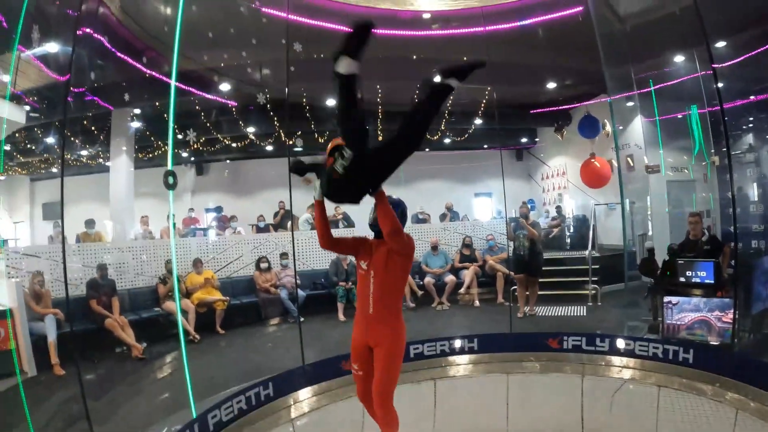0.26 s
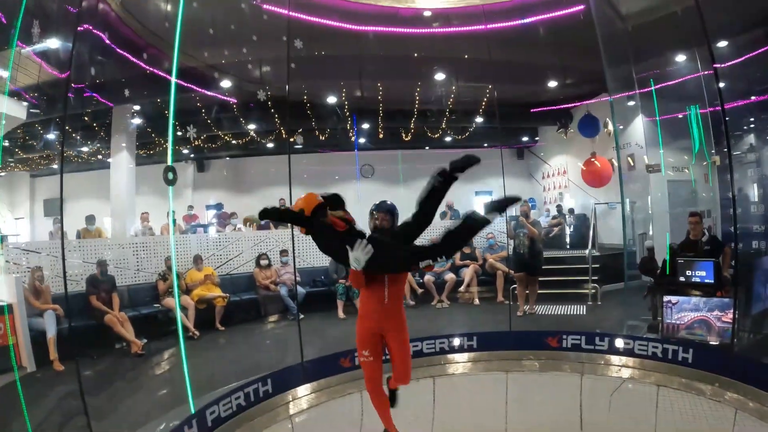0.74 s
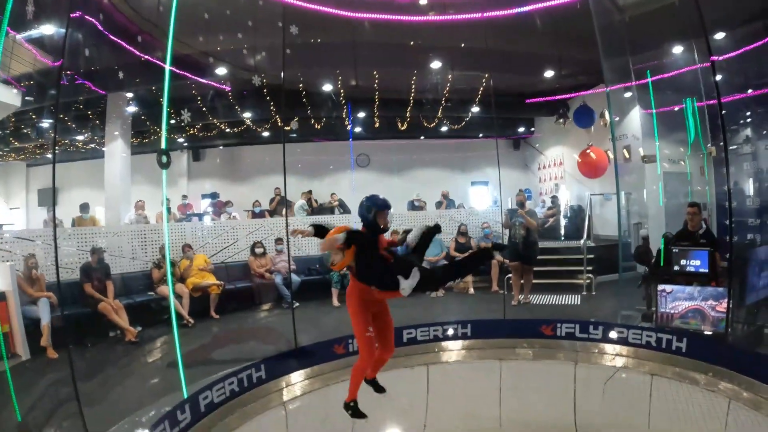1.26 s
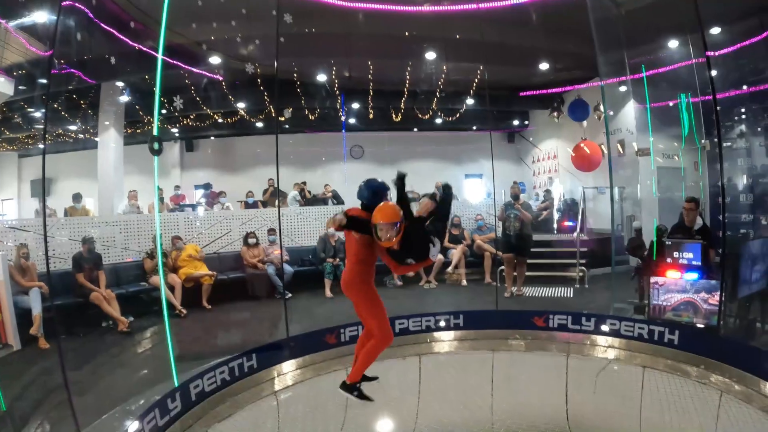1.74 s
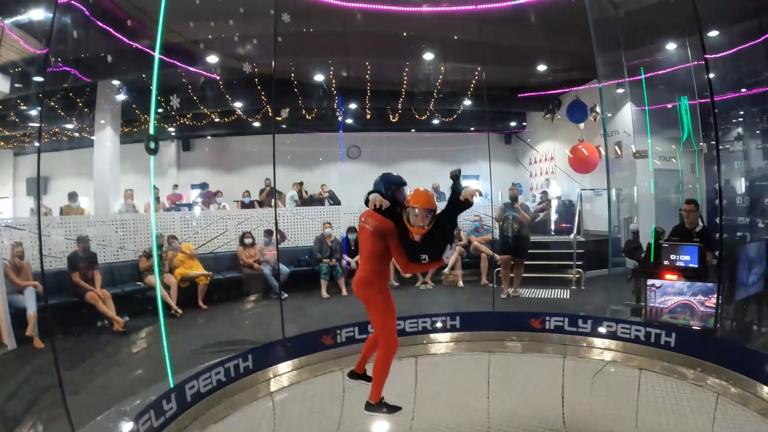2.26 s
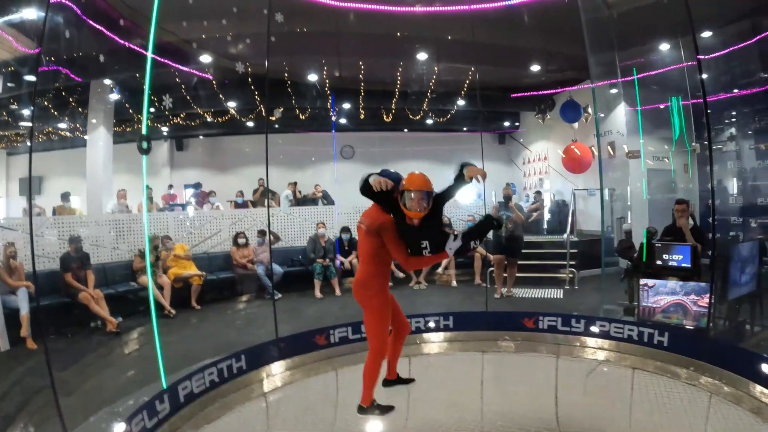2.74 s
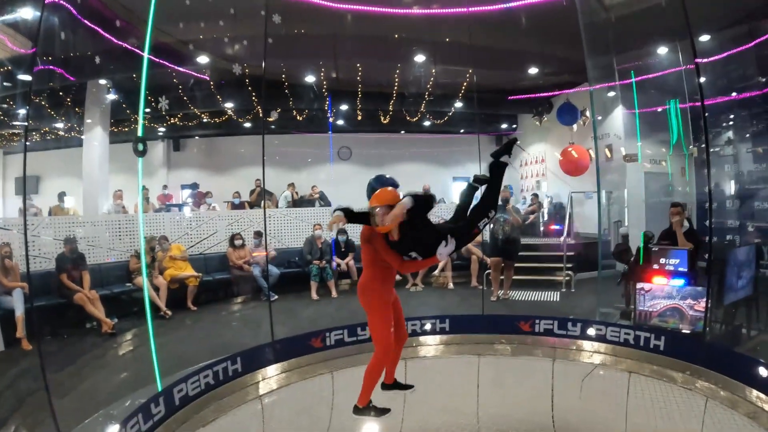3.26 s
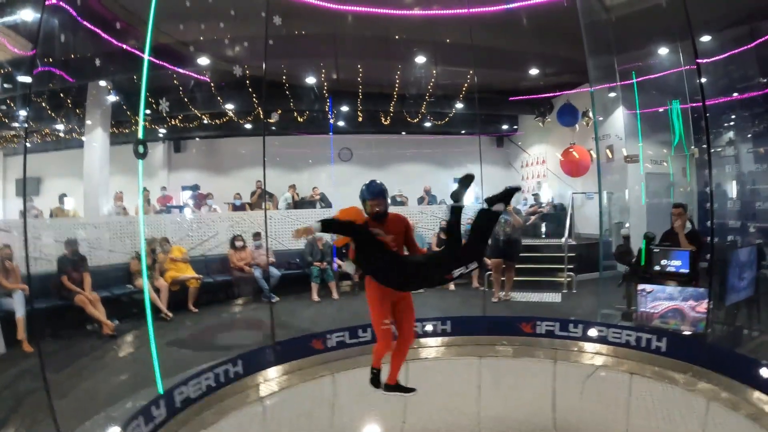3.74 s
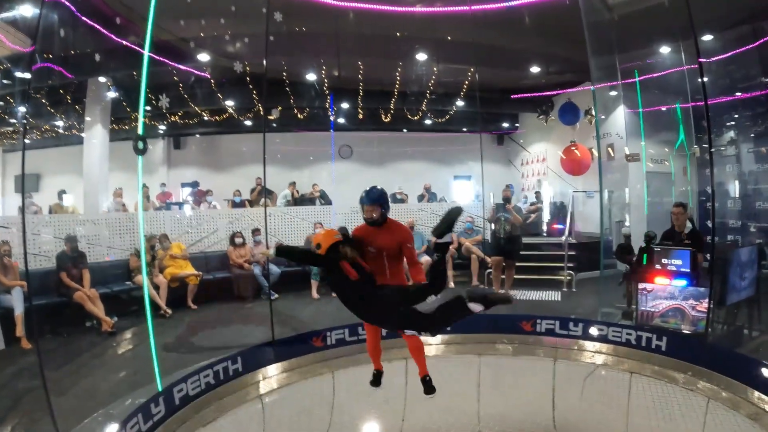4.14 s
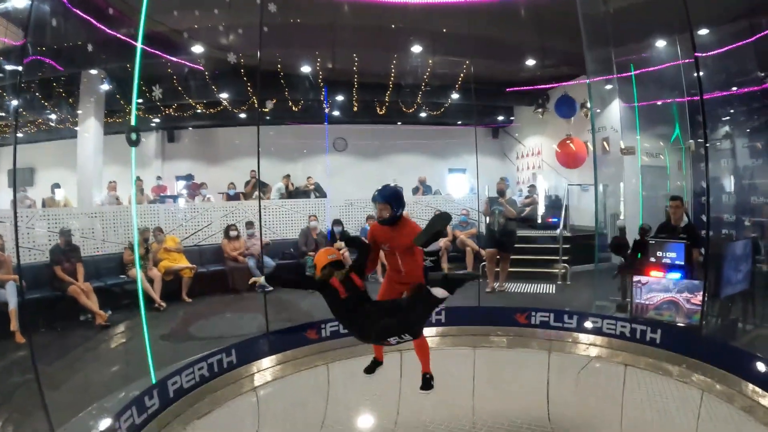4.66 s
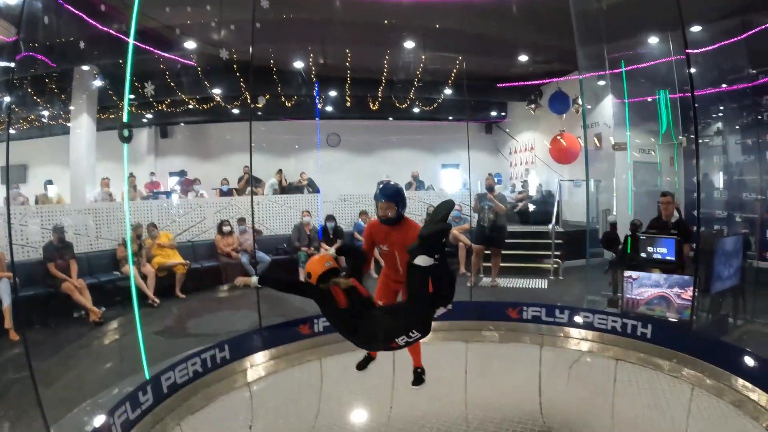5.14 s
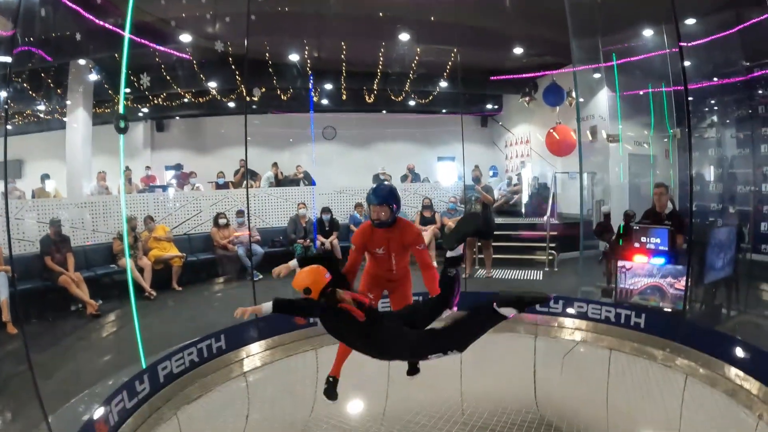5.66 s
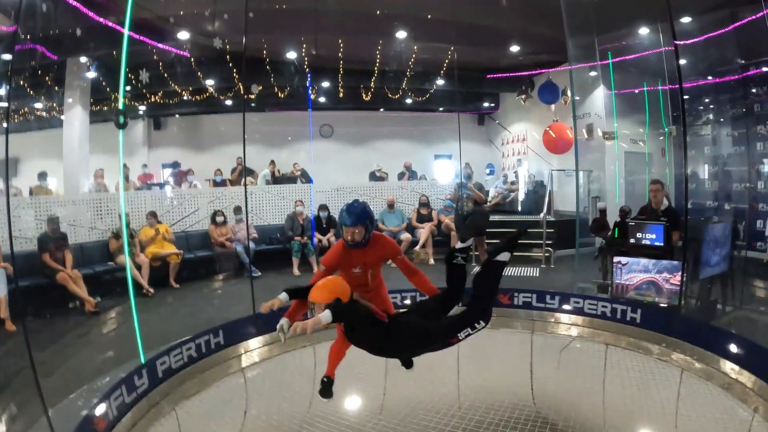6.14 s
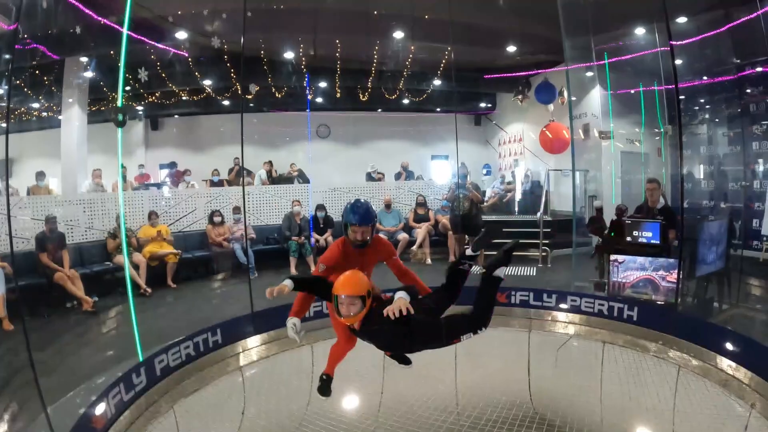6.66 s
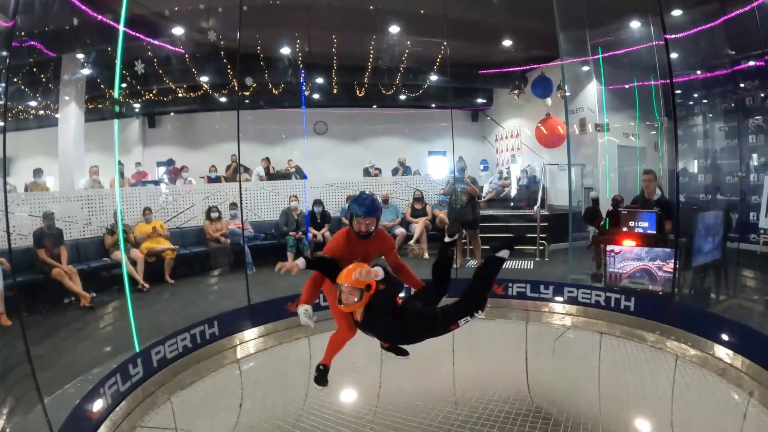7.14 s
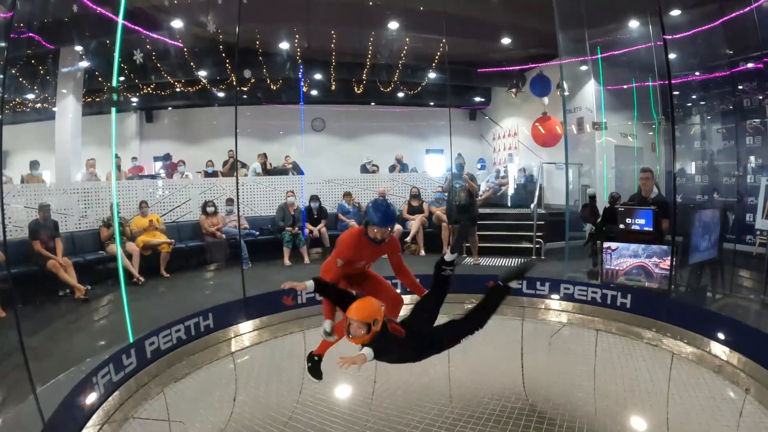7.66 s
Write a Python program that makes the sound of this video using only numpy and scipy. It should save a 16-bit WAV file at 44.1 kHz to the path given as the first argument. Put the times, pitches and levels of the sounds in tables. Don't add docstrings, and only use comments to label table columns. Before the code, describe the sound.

Close, rough wind noise fills the whole stretch, with the microphone sitting directly in the airflow of an indoor flight chamber. Bass buffeting swells heavily at the start and again around three seconds, under a fluttering rush with sharp little snaps and puffs. Distant fans whine weakly in a blurred high band. Late on, the low throb thins and the whine grows slightly clearer.

```python
import sys
import numpy as np
from scipy import signal
from scipy.fft import rfft, irfft
from scipy.io import wavfile
from scipy.ndimage import uniform_filter1d

SR = 44100
rng = np.random.default_rng(int(sys.argv[2]) if len(sys.argv) > 2 else 0)


def unload_audio(sound):
    columns = np.transpose(np.atleast_2d(sound))
    steps = np.round(np.clip(columns, -1, 1) * 32767)
    wavfile.write(sys.argv[1], SR, steps.astype(np.int16))


def rack_gain(trim_db):
    fader = np.asarray(trim_db, float)
    return 10 ** (fader / 20)


N = 348390

# start_s, turbulence_db, large_eddy_share_db, fan_whine_db
FLOW = [(0, 1, 5.5, -52.5), (.53, 0.7, -1.5, -51), (1.05, 0, 0, -49.5), (1.58, 0, 0, -49.5),
        (2.11, 0.8, 1, -49.5), (2.63, 0.5, 7, -51), (3.16, 1, 8.5, -51.5), (3.69, 0, 3.5, -53),
        (4.21, 1.5, 2, -52.5), (4.74, 1.2, 0, -53), (5.27, 0.55, 5.5, -54.5), (5.79, -1.5, 6, -54),
        (6.32, 0, -1.5, -53.5), (6.85, -0.7, -2, -49), (7.37, 0.2, -0.5, -48), (7.9, -1.6, -8.5, -47)]
# pitch_hz, level_db
BUFFET_SPECTRUM = [(12, -28.5), (22, -2), (50, 2.5), (111, -2), (171, -10), (261, -14.5), (421, -25),
                   (801, -43.5), (3010, -130)]
# pitch_hz, level_db
THROB_SPECTRUM = [(61, -4), (111, -10), (171, -8.5), (261, -11.5), (421, -27), (801, -46.5), (3010, -130)]
# pitch_hz, level_db
RUSH_SPECTRUM = [(101, -13), (201, -15), (391, -12.5), (701, -18), (1091, -23), (1611, -29), (2661, -34),
                 (3702, -38.5), (4730, -46), (7900, -59), (10200, -71), (12150, -78.5), (13500, -89),
                 (15650, -113)]
# pitch_hz, depth_db
GUST_DEPTH = [(210, 4), (710, 2), (2010, 4), (5020, 4), (10200, 2.5)]
# pitch_hz, width_hz, level_db
FAN_BANDS = [(3407, 220, -0.5), (3260, 290, -1.5), (3067, 270, -2)]
# start_s, peak_db
SNAPS = [(0.055, -48.5), (0.0686, -36), (0.5453, -32.5), (0.582, -43.5), (0.9368, -35.5), (1.021, -40),
         (1.4527, -39), (1.948, -42), (2.5614, -40), (2.728, -40), (2.8284, -31.5), (2.9148, -38.5),
         (3.0557, -39.5), (3.1552, -47), (3.264, -42), (3.2839, -33), (3.345, -38), (3.445, -41),
         (3.7745, -43), (4.097, -38.5), (4.1182, -36.5), (4.223, -38), (4.4988, -35.5), (4.5048, -36),
         (4.7107, -42), (4.8885, -37), (5.022, -41), (5.1208, -39), (5.687, -38), (6.0125, -45)]
# centre_s, body_db, treble_db, length_s
SURGES = [(0.07, 2.5, -4, 0.048), (0.315, 1, 7.5, 0.027), (0.537, 5, 3.8, 0.032), (0.932, 2.5, 3, 0.033),
          (1.004, 1.5, -3, 0.057), (1.213, 2.5, 6, 0.024), (1.431, 2, 1.5, 0.071), (1.711, 3, -1, 0.052),
          (1.915, 4, 4, 0.017), (1.957, 4.5, 3, 0.025), (2.206, 2.5, 5.5, 0.05), (2.434, 3, 0, 0.021),
          (2.821, 3.5, -2, 0.05), (2.92, 1.5, 8.5, 0.034), (3.014, 2.5, 7, 0.018), (3.19, 2.9, 6, 0.058),
          (4.51, 2.0, 4.2, 0.069), (4.89, 3, 2.9, 0.05), (5.072, 3, 9, 0.04), (5.416, 2, 4, 0.06),
          (5.559, 3.1, 4, 0.033), (5.758, 3, 4, 0.039), (5.945, 2.5, 8, 0.024), (6.027, 3, 4.2, 0.041),
          (6.186, 0, 1.6, 0.044), (6.401, 0, 4.2, 0.034), (6.93, 0.5, 5, 0.024), (7.583, 3.5, 3.5, 0.036),
          (7.686, 4.5, 1, 0.025), (7.864, 3.5, 6, 0.025)]
# centre_s, body_db, treble_db, length_s
LULLS = [(0.132, -2, -5.2, 0.063), (0.4, -5, -8, 0.021), (0.439, -1, -2, 0.066), (0.555, -11, -5, 0.019),
         (0.792, -2, -3, 0.029), (0.863, -8.5, -5.1, 0.014), (1.079, -4.2, -2, 0.047),
         (1.372, -4, -1.7, 0.045), (1.666, -5.1, -1, 0.029), (1.737, -5.5, -4.0, 0.035),
         (2.252, -6, -10, 0.025), (2.875, -6.0, -19, 0.052), (3.135, -5.5, -5, 0.043),
         (3.245, -3.5, -4.4, 0.035), (3.37, 0, -15, 0.027), (3.555, -11.5, -11, 0.03),
         (4.205, -3, -4.4, 0.03), (4.305, -4, -4, 0.08), (4.57, -5.5, -5, 0.068), (4.831, 0.5, -3.5, 0.042),
         (5.357, -5.5, -12, 0.035), (6.139, -8.5, -10, 0.02), (6.263, -9.5, -9, 0.039),
         (6.36, -6, -4.4, 0.041), (6.439, -4.7, -7, 0.024), (6.64, -10.5, -6.2, 0.037),
         (6.878, -2, -10, 0.058), (7.103, -12, -9, 0.035), (7.515, -7.5, -4, 0.03),
         (7.636, -12.5, -3, 0.057)]
# start_s, peak_db, brightness_db_per_octave
EDDIES = [(0.297, -29, -1), (0.354, -29, 0.5), (0.49, -33.5, -3), (0.632, -30.5, 1), (0.928, -31, -1.5),
          (0.9887, -28, 1.5), (1.194, -32.5, 0), (1.44, -34, -4), (1.623, -34, -3.5), (1.955, -35, 2),
          (2.629, -28.5, 0), (2.831, -29, 0), (2.916, -35, 3), (3.048, -30.5, 1.5), (3.096, -29.5, 0),
          (3.257, -31, 0), (3.654, -33, -1.5), (4.0951, -30, -0.5), (4.262, -40, 2), (4.4528, -28.5, 3),
          (4.51, -26, 2), (4.625, -34, -4.5), (4.705, -35, 3), (4.756, -33.5, -0.5), (4.8579, -33, -1),
          (4.958, -26, -0.5), (5.686, -32, 3), (6.391, -44, -5.5), (6.5949, -35, -2), (6.926, -32.5, -4)]
# start_s, peak_db, brightness_db_per_octave
SLAPS = [(1.4, -37.5, -4.5), (2.266, -31, -3), (2.901, -28.5, 0), (3.508, -34, 1.5), (3.574, -30.5, -2),
         (4.5622, -35.5, -6.5), (4.591, -34, -6), (5.028, -35.5, 4), (5.465, -27, 0.5),
         (5.629, -25.5, -0.5), (5.653, -32.5, -1), (6.824, -28.5, -3), (7.316, -36, -5.5)]
# centre_s, level_db, length_s
HEAVES = [(0.66, -5.5, 0.029), (0.838, 3.5, 0.046), (1.172, -4.3, 0.063), (1.38, -4.4, 0.044),
          (1.511, 5.5, 0.037), (1.704, -3.5, 0.097), (2.156, 3.5, 0.047), (2.379, -7, 0.05),
          (3.067, -1.5, 0.044), (3.146, -7, 0.041), (3.195, 2, 0.053), (3.259, -4.5, 0.045),
          (3.44, 2.5, 0.065), (3.526, -6.6, 0.087), (3.67, 2.5, 0.061), (3.96, -1.5, 0.068),
          (5.49, -5.5, 0.08), (5.673, 1.5, 0.058), (6.269, -6.5, 0.029), (6.346, -7, 0.038),
          (6.4, 4.5, 0.053), (6.458, -4, 0.052), (6.555, 2.5, 0.12), (6.89, 5, 0.085), (7.009, -6, 0.043),
          (7.054, 6, 0.04), (7.236, 5, 0.037), (7.47, -6.2, 0.034), (7.547, -9.5, 0.052), (7.7, 8.5, 0.042)]

BUFFET_DB, RUSH_DB, FIZZ_DB = -26, -33.5, -35
FIZZ_FOLLOWS = 1.3
TOP_HZ, TOP_CALM = 8500, 0.15
EDDY_S, SLAP_S = 0.0096, 0.0041
SMALL_EDDIES = 90
SMALL_DB, SMALL_SPREAD_DB, SMALL_TILT_DB = -42.5, -1, -3.5
HEAVE_HZ, HEAVE_CHANCE_DB = 510, 1.5


def evened(x):
    return x / np.sqrt(np.mean(x ** 2) + 1e-20)


def read(points, hz):
    f, value = np.transpose(points)
    return np.interp(np.log(hz + 1), np.log(f + 1), value)


def control(table, t, column):
    rows = np.array(table)
    return np.interp(t, rows[:, 0], rows[:, column])


def coloured(points, lo_hz, hi_hz):
    hz = np.fft.rfftfreq(N, 1 / SR)
    z = rfft(rng.standard_normal(N)) * rack_gain(read(points, hz))
    inside = (hz > lo_hz) & (hz < hi_hz)
    return irfft(z, N) * N / np.sqrt(2 * np.sum(abs(z[inside]) ** 2))


def flutter(count, step_s, lo_hz, hi_hz, slope):
    hz = np.fft.rfftfreq(count, step_s) + 1e-3
    shape = hz ** -slope / np.sqrt(1 + (lo_hz / hz) ** 4) / np.sqrt(1 + (hz / hi_hz) ** 4)
    return evened(irfft(rfft(rng.standard_normal(count)) * shape, count))


def buffet(heave):
    t = np.arange(N) / SR
    level_db = BUFFET_DB + 0.9 * flutter(N, 1 / SR, 4.1, 31.0, 0.45)
    gust_db = np.interp(t, t[::64], gusting(t[::64], column=1))
    heave_db = control(heave, t, column=1)
    throb_db = control(FLOW, t, column=2) + 0.21 * gust_db + 1.2 * heave_db
    throb_db += 1.2 * flutter(N, 1 / SR, 9.7, 36.0, 0.25)
    lumps = coloured(BUFFET_SPECTRUM, lo_hz=25, hi_hz=250) * rack_gain(-0.24 + 0.3 * heave_db)
    throb = coloured(THROB_SPECTRUM, lo_hz=25, hi_hz=250) * rack_gain(throb_db - 7.0)
    return rack_gain(level_db) * (lumps + throb)


def rush(heave):
    steady = coloured(RUSH_SPECTRUM, lo_hz=400, hi_hz=2800)
    hz, t, z = signal.stft(steady, SR, nperseg=256, noverlap=192)
    gusts = flutter(len(t), t[1], 7.2, 170.0, 0.22)
    patches = uniform_filter1d(rng.standard_normal((len(hz), len(t))), size=12, axis=0)
    patches = evened(uniform_filter1d(patches, size=6, axis=1))

    treble = np.clip(np.log2(hz / 2300 + 1e-3) / 1.2, 0, 1)[:, None]
    calm = 1 - TOP_CALM * np.clip(np.log2(hz / TOP_HZ + 1e-3) / 0.6, 0, 1)[:, None]
    flow_db = control(FLOW, t, column=1)
    body_db = RUSH_DB + flow_db + gusting(t, column=1)
    fizz_db = FIZZ_DB + FIZZ_FOLLOWS * flow_db + calm * gusting(t, column=2)
    field_db = (1 - treble) * body_db + treble * fizz_db
    field_db += read(GUST_DEPTH, hz)[:, None] * (0.83 * gusts + 0.46 * patches)
    heave_reach = np.clip(np.log2(HEAVE_HZ / (hz + 1)) / 0.8, 0, 1)
    field_db += np.outer(heave_reach, control(heave, t, column=1))

    octaves = np.log2(hz / 3100 + 0.05)
    roar_db = -42.0 + 0.78 * octaves
    power = rack_gain(field_db) ** 2 + rack_gain(roar_db)[:, None] ** 2
    for start_s, peak_db, tilt_db, length_s in bursts():
        shape = np.exp(-((t - start_s - 0.76 * length_s) / (0.59 * length_s)) ** 2)
        burst_db = peak_db + 0.5 + (tilt_db + 1.0) * octaves + 9.0 * (calm[:, 0] - 1)
        power += np.outer(rack_gain(burst_db) ** 2, shape)
    return signal.istft(z * np.sqrt(power), SR, nperseg=256, noverlap=192)[1][:N]


def whine():
    t, bands = np.arange(N) / SR, np.zeros(N)
    for pitch_hz, width_hz, band_db in FAN_BANDS:
        wandering_hz = pitch_hz + 34.0 * flutter(N, 1 / SR, 0.28, 3.0, 0.48)
        turn = np.exp(2j * np.pi * np.cumsum(wandering_hz) / SR)
        r = np.exp(-np.pi * width_hz / SR)
        smooth = signal.lfilter([1], np.convolve([1, -r], [1, -r]), rng.standard_normal(N) / turn)
        bands += rack_gain(band_db) * evened((turn * smooth).real)
    shade_db = 0.3 * np.interp(t, t[::64], gusting(t[::64], column=2))
    level_db = shade_db + control(FLOW, t, column=3) + 1.4 * flutter(N, 1 / SR, 3.3, 40.0, 0.69)
    return evened(bands) * rack_gain(level_db - 0.5)


def ticks():
    size_db = 5.3 * np.minimum(rng.exponential(1, N), 3) - 26.0
    size = rack_gain(size_db) * rng.choice([-1.0, 1.0], N)
    train = size * (rng.random(N) < 70.0 / SR)
    for start_s, peak_db in SNAPS:
        i = round(start_s * SR)
        train[i] += rack_gain(peak_db + 40.0) * np.sign(size[i])
    hz = np.fft.rfftfreq(256, 1 / SR)
    thin_db = 6.4 * np.log2(np.minimum(hz / 4000 + 0.02, 1))
    thin_db -= 7.0 * np.log2(np.maximum(hz / TOP_HZ, 1))
    snap = np.roll(irfft(rack_gain(read(RUSH_SPECTRUM, hz) + thin_db)), 128) * np.hanning(256)
    return rack_gain(-21.5) * signal.oaconvolve(train, snap / snap.max())[128:N + 128]


def gusting(t, column):
    rows = np.array(LULLS + SURGES)
    half_s = 0.45 * np.clip(rows[:, 3:], 0.008, 0.15)
    shape = np.exp(-abs((t - rows[:, :1]) / half_s) ** 5.5)
    return rows[:, column] @ shape


def bursts():
    when, size, tone = rng.random((SMALL_EDDIES, 3)).T
    small_db = SMALL_DB + SMALL_SPREAD_DB * (2 * size - 1)
    small_tilt_db = SMALL_TILT_DB + 2.7 * (2 * tone - 1)
    small = zip(when * N / SR, small_db, small_tilt_db)
    eddies = [(*row, EDDY_S) for row in [*EDDIES, *small]]
    return eddies + [(*row, SLAP_S) for row in SLAPS]


def heaving(t):
    centre_s, level_db, length_s = np.transpose(HEAVES)[:, :, None]
    roll = flutter(len(t), t[1], 5.7, 16.0, 0.2)
    shape = np.exp(-((t - centre_s) / (0.53 * np.clip(length_s, 0.01, 0.2))) ** 2)
    return level_db[:, 0] @ shape + HEAVE_CHANCE_DB * roll


def scene():
    clock = np.arange(0, N + 64, 64) / SR
    heave = np.transpose([clock, heaving(clock)])
    return (buffet(heave) + rush(heave) + ticks() + whine())[None]


def roll_off(x):
    return signal.sosfilt(signal.butter(12, 15300, fs=SR, output="sos"), x)


def record(dry):
    low = signal.sosfiltfilt(signal.butter(2, 150.0, fs=SR, output="sos"), dry)
    power = uniform_filter1d(uniform_filter1d(low ** 2, size=800), size=800)
    power_db = 10 * np.log10(abs(power) + 1e-12)
    held = low * rack_gain(-0.4 * (power_db - power_db.mean()))
    ceiling = 0.33
    softened = ceiling * np.tanh((dry - low + held) / ceiling)
    to_edge = np.minimum(np.arange(N), np.arange(N)[::-1])
    return roll_off(softened * np.minimum(to_edge / 60, 1))


dry = scene()
out = record(dry)
unload_audio(out)
```